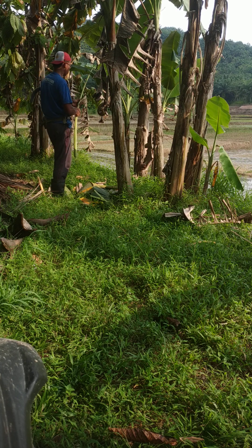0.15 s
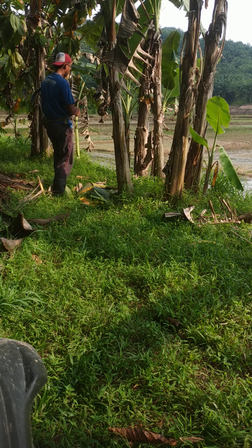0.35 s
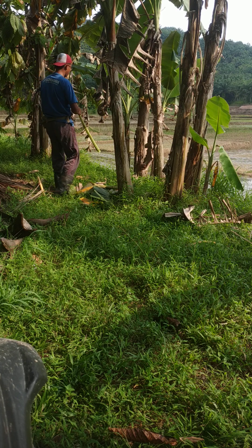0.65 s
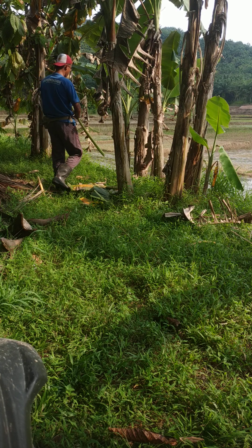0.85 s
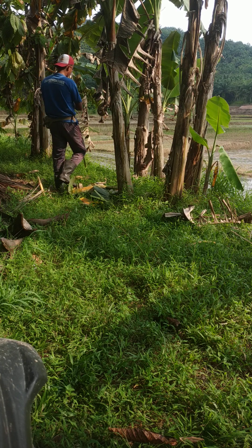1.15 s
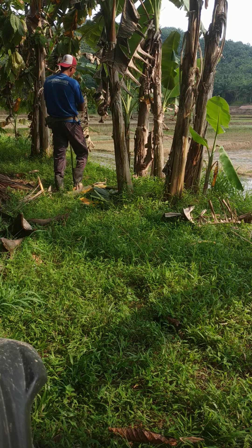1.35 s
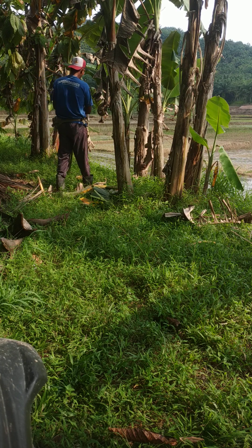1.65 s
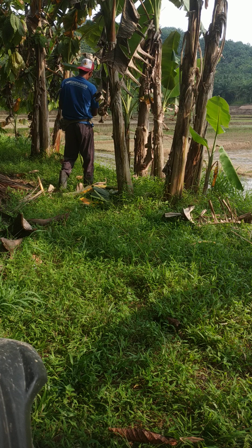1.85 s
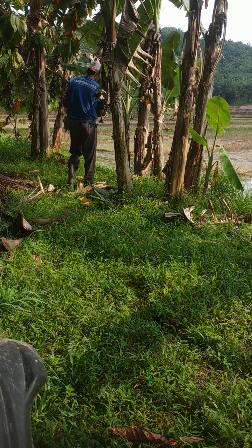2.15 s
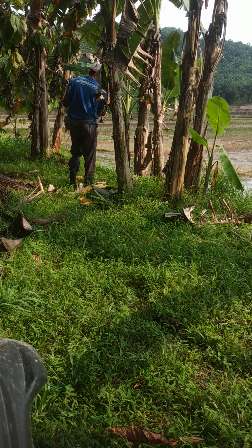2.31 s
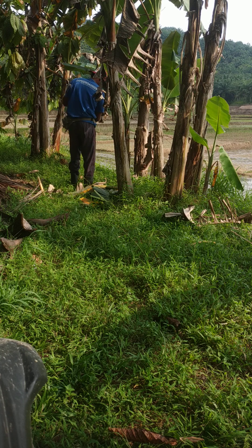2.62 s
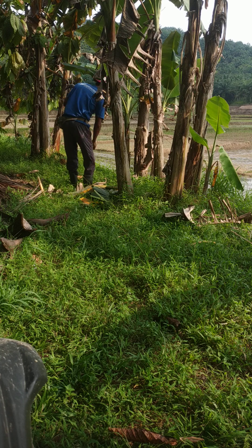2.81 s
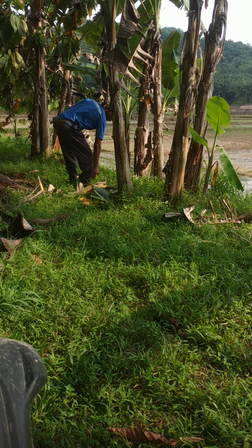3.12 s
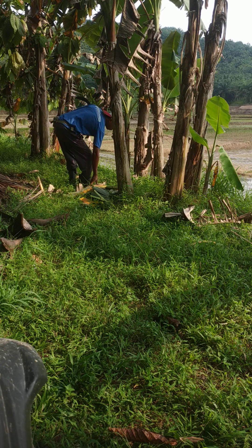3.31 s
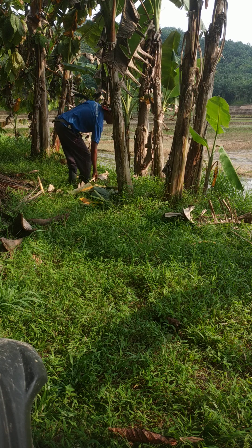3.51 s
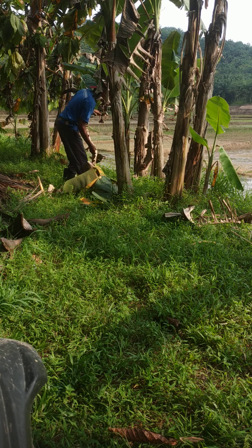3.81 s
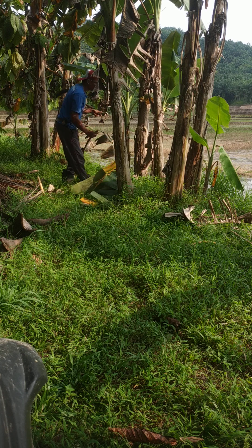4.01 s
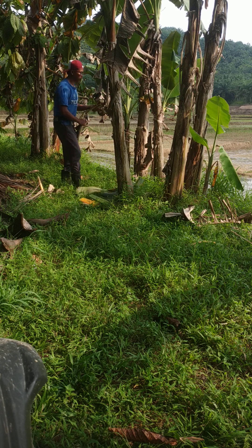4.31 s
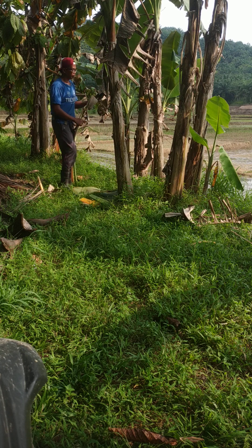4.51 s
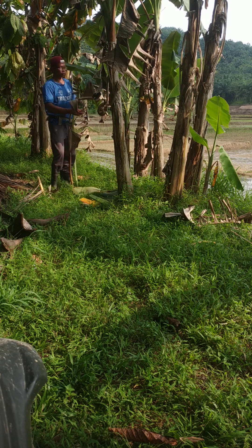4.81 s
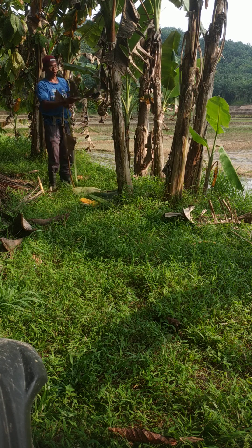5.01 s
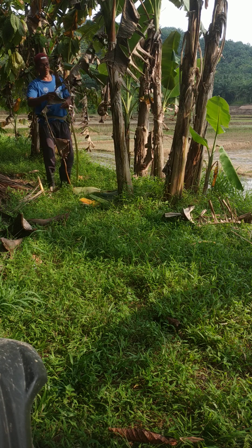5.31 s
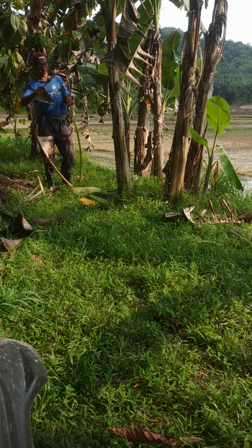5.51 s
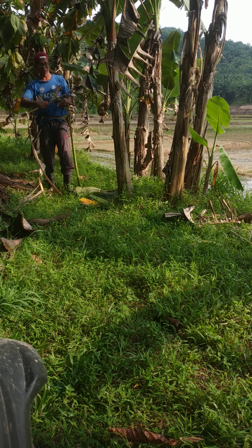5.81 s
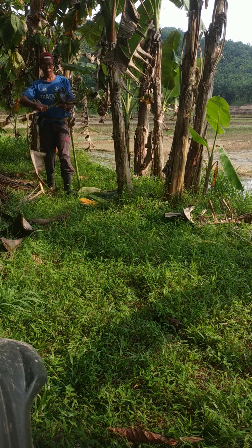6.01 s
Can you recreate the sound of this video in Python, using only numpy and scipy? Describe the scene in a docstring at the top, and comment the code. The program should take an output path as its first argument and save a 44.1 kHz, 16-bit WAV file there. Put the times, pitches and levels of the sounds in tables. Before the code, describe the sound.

A few metres away, dry plant fibres tear and rustle in jerks, sparse at first and then busy, against a soft outdoor hush.

```python
"""Stripping a banana plant

Some metres away a man pulls dry sheaths (the layers around the stem) off a banana plant. Fibres rip
in jerks and snap, a big leaf rasps over the grass, husks crumple in his hands and a stalk gives way.
Trunks and leaves scatter the sound. Behind it: quiet air, insects, a far engine and a faint whine."""
import sys
import numpy as np
from scipy import signal
from scipy.fft import rfft, irfft, next_fast_len
from scipy.io import wavfile
from scipy.ndimage import map_coordinates

SR = 44100
rng = np.random.default_rng(int(sys.argv[2]) if len(sys.argv) > 2 else 0)


def generate_wav(signal):
    """Clip the signal to [-1, 1] and save it as 16-bit WAV at the path in sys.argv[1]."""
    frames = np.transpose(np.atleast_2d(signal))
    scaled = np.clip(frames, -1, 1) * 32767
    pcm = np.round(scaled).astype(np.int16)
    wavfile.write(sys.argv[1], SR, pcm)


N = 271215

# tone colours of the background: (frequency [Hz], relative level [dB])
AIR_SPECTRUM = [(25, -34), (100, -27), (200, -5.5), (500, -9), (900, -10.5), (1600, -13), (2400, -12),
                (3500, -15), (4800, -15.5), (6300, -13.5), (8500, -10), (10800, -2), (11700, -5.5),
                (16000, -8.5)]
INSECT_SPECTRUM = [(3850, -40), (4070, -13), (4160, 15), (4270, 12.5), (4370, 8.5), (4460, -3), (4650, 3),
                   (4900, 4.5), (5300, -6), (5600, -38)]
ENGINE_SPECTRUM = [(50, -38), (110, -12.5), (145, -5), (210, 3), (280, -3), (450, -39), (900, -53)]
# how alike the air sounds on the left and right: (frequency [Hz], likeness [0 to 1])
AIR_LIKENESS = [(60, 0.92), (180, 0.32), (550, 0.67), (950, 0)]
# the far engine growing louder and softer: (time [s], level [dB])
ENGINE_LEVELS = [(0.0, -62.5), (0.72, -67.5), (2.19, -62), (3.56, -63.5), (3.82, -62), (6.15, -71)]
# electrical tones: (pitch [Hz], level [dB])
WHINE_TONES = [(1055, -73), (1249, -69.5), (3364, -71.5), (3557, -72), (5669, -71), (5862, -72.5),
               (10282, -71.5), (10476, -61.5), (10860, -74), (11337, -83), (11531, -81), (12588, -66),
               (12781, -63), (13450, -74), (13644, -67), (13838, -62), (14031, -68), (14125, -68),
               (14510, -74), (15090, -72)]
# a sheath sliding or peeling:
# (time [s], length [s], level [dB], start pitch [Hz], end pitch [Hz], width [Hz])
SHEATH_RASPS = [(1.487, 0.057, -53, 950, 980, 450), (3.764, 0.14, -50, 1510, 1620, 700),
                (3.79, 0.078, -42, 2200, 2130, 890), (3.886, 0.044, -41.5, 2230, 2420, 845),
                (4.02, 0.048, -45, 2300, 2150, 700), (5.092, 0.07, -47, 746, 650, 476),
                (5.249, 0.025, -43.5, 634, 820, 440), (5.257, 0.031, -41.5, 1300, 1330, 600),
                (5.322, 0.077, -42, 1000, 890, 444), (5.32, 0.04, -40, 1300, 1600, 890),
                (5.35, 0.059, -47, 2050, 1800, 700), (5.336, 0.055, -47.5, 565, 500, 260)]
# the tones the stalk rings with: (pitch [Hz], relative level [dB], time to fade by 60 dB [s])
STALK_TONES = [(325, -28, 0.06), (682, -11, 0.12), (810, -3, 0.028), (900, -5, 0.052), (1330, -3, 0.043),
               (2040, -6, .04), (2650, -14, 0.045), (3150, -13, .03)]
# hollow sheaths and stalks buckling: (time [s], peak level [dB], pitch [Hz], width [octaves])
BUCKLES = [(1.3475, -31, 2040, 0.28), (1.3475, -40.5, 970, 1.4), (1.358, -35, 2270, 0.58),
           (1.431, -39, 2200, 0.29), (1.444, -42.5, 880, 0.46), (1.512, -44.5, 945, 0.26),
           (1.621, -45, 2180, 0.48), (1.656, -47, 1040, .45), (1.858, -40.5, 2150, 0.68),
           (2.313, -40, 2120, 0.51), (2.44, -46, 500, 2.5), (2.897, -47, 1900, 3),
           (3.745, -37.5, 398, 1.44), (4.03, -38.5, 354, 1.3), (4.076, -31.5, 235, 0.68),
           (4.08, -33, 600, 0.89), (4.316, -41.5, 225, 0.4), (4.316, -39, 700, 1.6), (4.697, -34, 517, 1.5),
           (4.759, -32, 400, 1.7), (4.839, -37, 790, 1.4), (5.095, -33.5, 643, 3), (5.151, -36, 620, 1),
           (5.279, -30.5, 1050, 0.96), (5.379, -32, 850, 1.7), (5.462, -38.5, 466, 0.72),
           (5.49, -40.5, 1720, .3), (5.558, -34, 2630, 2.8), (5.607, -37.5, 950, 2.4),
           (5.868, -47, 680, 0.43), (6.037, -38.5, 613, 0.97), (6.039, -36, 1990, 1)]
# hands moving along the sheaths:
# (time [s], hold [s], crackle level [dB], rub relative to crackle [dB], flex relative to crackle [dB])
HAND_STROKES = [(1.394, .04, -45, -7.5, -22), (1.483, 0.034, -41, -9, -20), (1.643, 0.11, -51.5, -16, -26),
                (2.054, 0.015, -43.5, -14, -22), (2.312, 0.033, -39, -25, -46),
                (2.546, 0.037, -52, -32, -31), (2.994, 0.038, -46.5, -21, -18),
                (3.33, 0.012, -46, -11.5, -18), (3.488, 0.019, -40.5, -9, -17),
                (3.653, 0.13, -38, -13.5, -17), (3.826, 0.11, -34.5, -10.5, -16),
                (4.022, 0.12, -34, -13.5, -15), (4.338, 0.096, -37, -13.5, -17),
                (4.564, 0.066, -37, -14.5, -17), (4.731, 0.073, -33, -13.5, -18.5),
                (4.846, 0.12, -36, -11, -13.5), (5.026, 0.082, -36, -16, -15),
                (5.19, 0.078, -37.5, -12.5, -12.5), (5.303, 0.025, -33, -25, -31),
                (5.345, 0.041, -33.5, -8, -15), (5.44, 0.083, -45.5, -12.5, -13.5),
                (5.588, 0.025, -40, -23, -25), (5.727, 0.069, -45, -28, -11.5),
                (5.86, 0.11, -39, -14.5, -17.5), (6.04, 0.017, -35.5, -22, -24),
                (6.134, 0.032, -34, -11.5, -19)]
# tone colours of crackling fibres, rubbing leaves, flexing sheaths: (frequency [Hz], relative level [dB])
CRACKLE_SPECTRUM = [(1500, -62), (2600, -19), (3600, -10), (5000, -4.5), (6400, -8.5), (7800, 0),
                    (9800, 0.5), (11500, -0.5), (14500, -3), (16000, -13.5)]
RUB_SPECTRUM = [(700, -7.5), (1400, 0), (1900, 0.5), (2400, 2.5), (3100, -1), (4800, -8.5), (6200, -38),
                (9000, -30)]
FLEX_SPECTRUM = [(90, -54), (190, -8), (350, -1.5), (800, 1.5), (1300, -5), (2500, -4), (5000, -58)]
# single fibres snapping: (time [s], peak level [dB], pitch [Hz], time until the last strand parts [s])
FIBRE_SNAPS = [(0.469, -29, 9400, .001), (1.3483, -12.5, 9300, .0005), (2.3100, -29, 7000, 0.0015),
               (2.317, -29, 6500, 0.0011), (2.32, -26, 9500, .001), (2.8975, -27, 14000, .002),
               (3.507, -19.5, 12500, .003), (3.7475, -31, 5230, .002), (4.3167, -19, 9400, .003),
               (4.3245, -20, 10500, .002), (4.331, -25, 10000, .001), (4.421, -22, 9600, .002),
               (4.6712, -23, 9500, .002), (4.7375, -23, 10000, .0005), (4.7555, -16.5, 11000, .0012),
               (4.8425, -18, 9000, .003), (4.8738, -20.5, 9500, .001), (4.9620, -24, 9500, .002),
               (5.0289, -27, 9500, .002), (5.0947, -24, 11000, .002), (5.1005, -27, 11500, .001),
               (5.1505, -18, 10600, 0.0026), (5.151, -22, 7500, .001), (5.1881, -22, 9450, .001),
               (5.2020, -22, 9000, .001), (5.227, -22, 9500, .002), (5.2568, -19, 9400, .001),
               (5.2788, -15, 9000, .002), (5.3365, -19.5, 7000, .001), (5.345, -19, 8900, .001),
               (5.3490, -24, 9500, .0005), (5.4088, -26, 9800, .001), (5.4229, -20.5, 9800, .0003),
               (5.5573, -19, 6850, .0008), (5.5567, -18, 13500, .0009), (5.5754, -22, 9000, .0008),
               (5.6705, -18, 10100, .0004), (5.8545, -20.5, 9500, .002), (5.9092, -26, 9500, .001),
               (5.9378, -17, 10400, .0003), (5.9530, -24, 9500, .0005), (5.9718, -22, 10000, .0005),
               (6.0505, -19, 9500, .001), (6.095, -16, 9800, .0007), (6.1020, -18, 9400, .001),
               (6.1420, -17.5, 10000, .0004)]
# bundles of fibres ripping: (time [s], level [dB], wood relative to fibres [dB], length [s])
BUNDLE_RIPS = [(1.349, -30.5, -12, 0.013), (2.246, -37.5, -12.5, 0.0089), (2.264, -37.5, -33, 0.022),
               (2.286, -33, -20, 0.012), (2.308, -33.5, -21, .011), (2.896, -44, -7.5, 0.0018),
               (3.501, -31.5, -13, 0.013), (3.746, -39.5, -4.5, 0.021), (3.832, -36, -12, 0.025),
               (3.965, -32.5, -10, 0.0096), (4.3126, -31.5, -14, 0.004), (4.323, -28.5, -22, 0.0056),
               (4.576, -48, -6, 0.011), (4.775, -36, -9, .004), (4.8376, -25, -13, 0.0061),
               (4.871, -33.5, -10, 0.0065), (4.9603, -32, -12, 0.013), (5.028, -37, -17, 0.012),
               (5.094, -32.5, -9, 0.0043), (5.1487, -32.5, -9.5, 0.0026), (5.186, -34, -9, .015),
               (5.2275, -34, -15, .002), (5.254, -32, -9.5, 0.013), (5.278, -29.5, -16, 0.003),
               (5.296, -34.5, -17, 0.01), (5.331, -34.5, -7, 0.022), (5.5568, -39, -10, 0.0011),
               (5.825, -40, -1.5, 0.014), (5.852, -36, -10, 0.0099), (5.909, -36, -13, 0.017),
               (5.945, -33, -29, .008), (6.044, -35, -7, 0.0052)]
# tone colours of tearing fibres and the woody sheath they shake: (frequency [Hz], relative level [dB])
TEAR_SPECTRUM = [(1500, -33), (2600, -17), (4000, -6.5), (5500, -2.5), (8000, 5), (10000, 6), (13000, 2),
                 (14500, 2), (16000, 7.5)]
WOOD_SPECTRUM = [(700, -10.5), (1400, -6), (2050, 0), (2700, -1), (3600, 2.5), (7000, -22)]


def amp(db):
    """Turn decibels into a gain to multiply by."""
    return 10 ** (np.asarray(db) / 20)


def unit(x):
    """Scale a sound to an average power of 1."""
    return x / np.sqrt(np.mean(x ** 2) + 1e-20)


def along(points, hz):
    """Read between (frequency, value) points on a logarithmic frequency axis."""
    freqs, values = np.transpose(points)
    return np.interp(np.log(hz + 1), np.log(freqs + 1), values)


def wobble(rate):
    """A smooth curve through `rate` random values a second."""
    return map_coordinates(rng.standard_normal(int(N * rate / SR) + 4), [np.arange(N) * rate / SR])


def filtered(x, response):
    """Scale each frequency of a sound by response(hz)."""
    size = next_fast_len(N + SR // 2)
    return irfft(rfft(x, size) * response(np.fft.rfftfreq(size, 1 / SR)), size)[..., :N]


def coloured(x, spectrum):
    """Give a sound a tone colour, at an average power of 1."""
    return unit(filtered(x, lambda hz: amp(along(spectrum, hz))))


def add(track, start_s, sound):
    """Mix a sound into a track at the given time."""
    part = track[..., max(round(start_s * SR), 0):][..., :sound.shape[-1]]
    part += sound[..., :part.shape[-1]]


def outdoors(x, echo_db, fade_s, lag_s, spread_hz=510):
    """Sound reaches the left lag_s late; leaves and trunks add echoes that fall 60 dB in fade_s."""
    t, echoes = np.arange(SR // 10) / SR, np.zeros((2, N))
    for start in range(0, N, len(t)):  # the paths change as the sheaths move
        tail = rng.standard_normal((2, len(t))) * amp(-60 * t / fade_s)
        tail /= np.linalg.norm(tail, axis=1, keepdims=True)
        add(echoes, start / SR, signal.fftconvolve(x[None, start:start + len(t)], tail, axes=1))
    shared = echoes[1]  # below spread_hz both sides get much the same echoes
    apart = filtered(echoes[0] - shared, lambda hz: hz ** 2 / (hz ** 2 + spread_hz ** 2))
    echoes = np.array([shared + apart, shared])
    direct = np.array([np.roll(x, round(lag_s * SR)), x])
    return (direct + amp(echo_db) * echoes) / np.hypot(1, amp(echo_db))


def cracks(rate, top_hz, life_s, spread_db, samples):
    """Tiny cracks, `rate` a second, each a dying ring with its own pitch and strength."""
    when, pitch, phase, chance = rng.random((int(rate * N / SR), 4)).T[:, :, None]
    age = np.arange(samples)
    strength = amp(-spread_db * np.log(np.maximum(chance, .01)))  # many weak, few strong
    waves = np.cos(2 * np.pi * (pitch * top_hz * age / SR + phase))
    rings = strength * np.exp(-age / SR / life_s) * waves
    return np.bincount(((when * N).astype(int) + age).ravel(), rings.ravel(), N)[:N]


def air(level_db=-48):
    """An even outdoor hush: alike on both sides in the deep bass, unrelated in the treble."""
    def shares(hz):
        angle = np.arccos(np.clip(along(AIR_LIKENESS, hz), 0, 1)) / 2
        return np.array([np.cos(angle), np.sin(angle)])
    shared, apart = filtered(rng.standard_normal((2, N)), shares)
    hush = coloured(np.array([shared + apart, shared - apart]), AIR_SPECTRUM)
    return amp(level_db + 0.08 * wobble(3.46)) * hush


def insects():
    """Many far insects merge into one high, fluttering hiss."""
    return amp(-60.5 + 1.6 * wobble(40)) * coloured(rng.standard_normal((2, N)), INSECT_SPECTRUM)


def engine(firing_hz=22.6):
    """A far, slow engine: every firing is a soft thud, blurred by a rumble of echoes."""
    firings = np.cumsum(firing_hz * (1 + 0.0204 * wobble(1.5))) / SR
    thuds = np.diff(np.floor(firings), prepend=0) * amp(0.55 * wobble(21.77))
    blurred = unit(thuds) + 0.99 * rng.standard_normal(N)
    rumble = outdoors(blurred, echo_db=-13, fade_s=0.16, lag_s=.00005)
    level_db = np.interp(np.arange(N) / SR, *np.transpose(ENGINE_LEVELS))
    return amp(level_db) * coloured(rumble, ENGINE_SPECTRUM)


def whine():
    """The recorder's electronics give thin tones that drift and waver together."""
    clock = np.arange(N) / SR + 0.000122 * wobble(1.5) + .000008 * wobble(30)
    return np.sqrt(2) * sum(amp(db) * np.sin(2 * np.pi * hz * clock) for hz, db in WHINE_TONES)


def rasps(rise_s=0.0031, fall_s=0.012, jerk_db=3.5, jerks_per_s=220):
    """Fibres catch and slip on a hollow sheath; its pitch glides as the loose part changes length."""
    sliding, t = np.zeros(N), np.arange(SR // 5) / SR
    slips = cracks(rate=1600, top_hz=2980, life_s=0.0002, spread_db=1.5, samples=40)
    jerks = unit(amp(jerk_db * wobble(jerks_per_s)))
    for start, length, db, start_hz, end_hz, width_hz in SHEATH_RASPS:
        pitch_hz = np.interp(t, [0, length], [start_hz, end_hz])
        glide = np.exp(2j * np.pi * np.cumsum(pitch_hz) / SR)
        lowpass = signal.butter(2, width_hz / 2, fs=SR, output="sos")
        # shift the pitch down to 0 Hz, keep what lies near it, and shift it back
        shifted = slips[round(start * SR):][:len(t)] / glide
        ring = (signal.sosfilt(lowpass, shifted) * glide).real
        swell = (1 - np.exp(-t / rise_s)) * np.exp(-np.maximum(t - length, 0) / fall_s)
        add(sliding, start, amp(db) * swell * unit(ring))
    return outdoors(sliding * jerks, echo_db=-1.5, fade_s=0.068, lag_s=.00005)


def stalk_knock(start_s=5.8253, level_db=-32.5):
    """The woody stalk gives way with one dull knock, made of tones that die quickly."""
    stalk, t = np.zeros(N), np.arange(SR // 6) / SR
    for hz, db, fade_s in STALK_TONES:
        add(stalk, start_s, amp(level_db + db - 60 * t / fade_s) * np.sin(2 * np.pi * hz * t))
    return outdoors(stalk, echo_db=-4, fade_s=.07, lag_s=.00006)


def buckles(crumple_db=2):
    """A buckling sheath gives a blow and a brief crumple; the hollower it is, the purer its pitch."""
    knocks, t = np.zeros(N), np.arange(SR // 6) / SR
    blow = t == 0
    for start, db, hz, octaves in BUCKLES:
        fade_s = 0.072 * (600 / (hz * octaves)) ** 0.16  # narrower bands ring longer
        edge = 2 ** (octaves / 2)
        band = signal.butter(2, [hz / edge, hz * edge], "bandpass", fs=SR, output="sos")
        crumple = rng.standard_normal(len(t)) * amp(-60 * t / fade_s)
        knock = signal.sosfilt(band, blow + amp(crumple_db) * crumple / np.linalg.norm(crumple))
        add(knocks, start, amp(db) * knock / np.abs(knock).max())
    return outdoors(knocks, echo_db=-7, fade_s=0.065, lag_s=.00006)


def hand_strokes(rise_s=0.058, fall_s=0.048):
    """Each stroke swells, holds and fades; gives the gains of crackling, rubbing and flexing."""
    t, power = np.arange(N) / SR, np.zeros((3, N))
    for start, hold, db, rub_db, flex_db in HAND_STROKES:
        ease_s = 0.34 * hold  # longer strokes start and stop more gently
        before = np.maximum(start - t, 0) / (rise_s + ease_s)
        after = np.maximum(t - start - hold, 0) / (fall_s + ease_s)
        gain = amp(db - 10 * np.minimum(before + after, 10))
        power += (amp([[0], [rub_db], [flex_db]]) * gain) ** 2
    return np.sqrt(power)


def rustle():
    """Handled sheaths crackle, rub and flex; all three catch and slip together."""
    crackle_gain, rub_gain, flex_gain = hand_strokes()
    catch = wobble(55)
    fine = unit(cracks(rate=3500, top_hz=17500, life_s=0.000098, spread_db=3, samples=40))
    thick = unit(cracks(rate=140, top_hz=15400, life_s=0.00075, spread_db=5, samples=40))
    crackle = outdoors(fine, echo_db=19, fade_s=0.15, lag_s=.0001)
    crackle += amp(-13.5) * outdoors(thick, echo_db=7, fade_s=0.1, lag_s=.0001)
    rub = cracks(rate=3000, top_hz=8040, life_s=0.00076, spread_db=2.5, samples=120)
    rub = outdoors(rub, echo_db=5.5, fade_s=0.1, lag_s=.00002)
    flex = cracks(rate=900, top_hz=2964, life_s=0.0012, spread_db=0, samples=400)
    flex = outdoors(flex, echo_db=-3, fade_s=0.17, lag_s=.00006)
    return (crackle_gain * amp(0.5 * catch) * coloured(crackle, CRACKLE_SPECTRUM)
            + rub_gain * amp(-0.7 + 0.96 * catch) * coloured(rub, RUB_SPECTRUM)
            + flex_gain * amp(0.4 + 0.95 * catch) * coloured(flex, FLEX_SPECTRUM))


def snaps():
    """A brittle fibre gives one bright click, then two weaker ones as its last strands part."""
    clicks, t = np.zeros(N), np.arange(SR // 200) / SR
    ring = lambda hz: np.exp(-t / 0.00022) * (1 - np.exp(-t / .00005)) * np.sin(2 * np.pi * hz * t)
    for start, db, hz, length in FIBRE_SNAPS:
        delay, middle_shift, last_shift = 2 * rng.random(3) - 1
        gain = amp(db) / np.abs(ring(hz)).max()
        add(clicks, start, gain * ring(hz))
        add(clicks, start + length * (.5 + 0.3 * delay), 0.58 * gain * ring(hz * (1 + .09 * middle_shift)))
        add(clicks, start + length, 0.41 * gain * ring(hz * (1 + 0.22 * last_shift)))
    bright = signal.sosfilt(signal.butter(1, 1500, "highpass", fs=SR, output="sos"), clicks)
    return outdoors(bright, echo_db=-4, fade_s=0.13, lag_s=0.00008)


def rips(rise_s=0.0008, typical_db=-35.5, doubling_db=9.5):
    """Each jerk sets off a dense run of breaking fibres that shakes the woody sheath and dies away."""
    fibre_gain, wood_gain, t = np.zeros(N), np.zeros(N), np.arange(SR // 3) / SR
    for start, db, wood_db, length in BUNDLE_RIPS:
        fade_s = 0.11 * 2 ** ((db - typical_db) / doubling_db)  # stronger rips fade more slowly
        burst = amp(db - 60 * np.maximum(t - length, 0) / fade_s) * (1 - np.exp(-t / rise_s))
        add(fibre_gain, start, burst)
        add(wood_gain, start, burst * amp(wood_db))
    fibres = cracks(rate=4900, top_hz=17320, life_s=0.0013, spread_db=2.5, samples=40)
    fibres = outdoors(fibres, echo_db=5.5, fade_s=0.076, lag_s=0.00013)
    wood = cracks(rate=6800, top_hz=7200, life_s=0.00024, spread_db=1, samples=160)
    wood = outdoors(wood, echo_db=-1.5, fade_s=0.048, lag_s=.0001)
    return fibre_gain * coloured(fibres, TEAR_SPECTRUM) + wood_gain * coloured(wood, WOOD_SPECTRUM)


def scene():
    """The work is a little louder on the left, the background on the right."""
    work = rustle() + rasps() + rips() + snaps() + buckles() + stalk_knock()
    # the deep bass is cut from the work sounds
    work = signal.sosfilt(signal.butter(4, 185, "highpass", fs=SR, output="sos"), work)
    background = air() + insects() + whine() * amp([[-1.5], [1]])
    return work * amp([[.9], [-.9]]) + background * amp([[-1.8], [1.2]]) + engine() * amp([[-1], [.8]])


def record(dry):
    """Cut off the very highest treble."""
    return filtered(dry, lambda hz: hz < 15850)


dry = scene()
out = record(dry)
generate_wav(out)
```